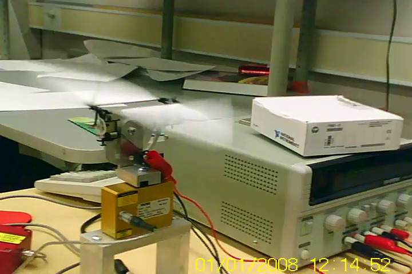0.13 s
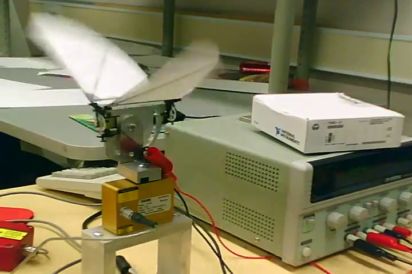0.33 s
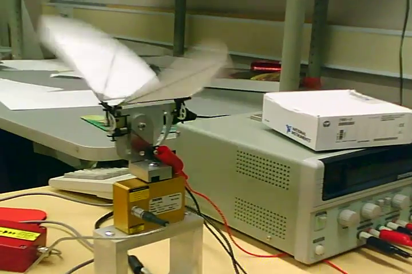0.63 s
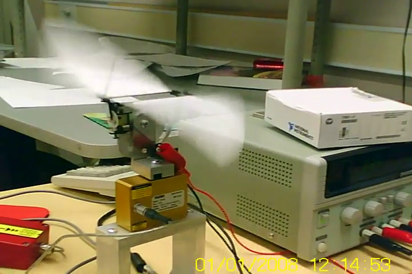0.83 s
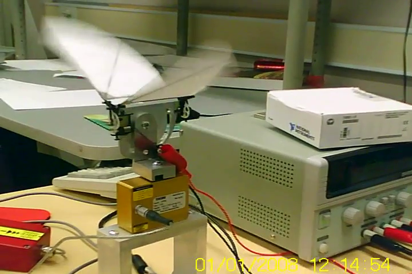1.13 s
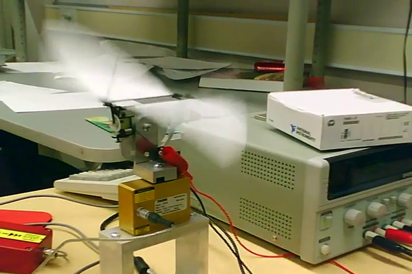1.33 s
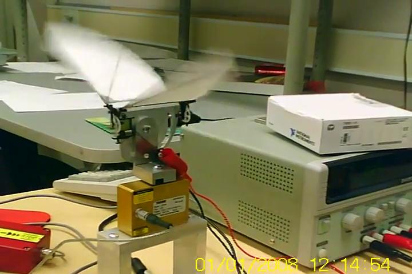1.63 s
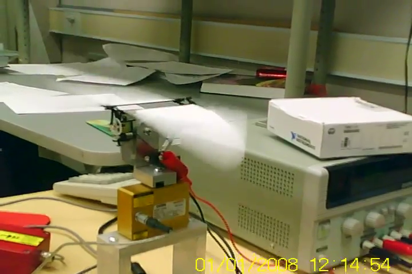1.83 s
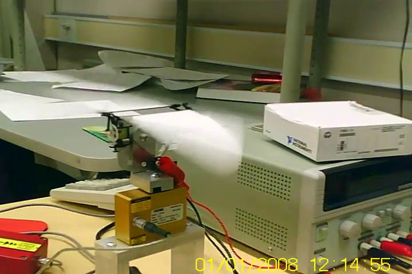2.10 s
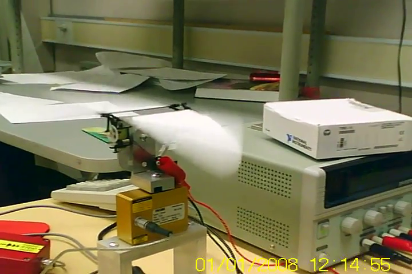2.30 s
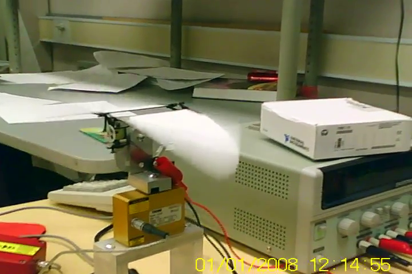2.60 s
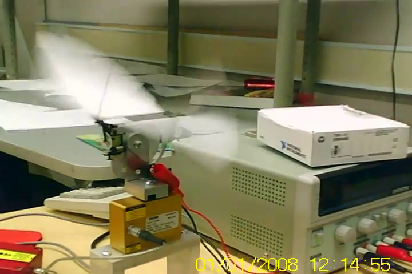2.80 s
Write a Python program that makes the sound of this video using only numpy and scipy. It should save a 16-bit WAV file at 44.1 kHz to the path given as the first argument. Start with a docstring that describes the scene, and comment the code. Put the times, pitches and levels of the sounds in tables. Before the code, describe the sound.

After a faint hiss with a soft low thump, a small flapping-wing machine starts abruptly at full speed, its gears rattling about twenty bursts a second, with hum and wing puffs buffeting a close microphone in a lab.

```python
"""A lab bench, faint at first: a soft low thump as the recorder's input switches on, with thin hiss and whine.
Then a small motor-driven flapping-wing rig cuts in at full speed, its crank beating the wings ten times a second.
On each up and down stroke loaded gear teeth, as bursts of coloured noise, rattle through the frame into the room.
The rig hums in wavering sines, and the wings buffet the microphone with low noise and puffs of air.
Two sharp ticks, the second as a short filtered-noise scrape begins, stand out; a higher tick comes later."""
import sys
import numpy as np
from scipy import signal
from scipy.fft import rfft, irfft
from scipy.io import wavfile

SR = 44100
rng = np.random.default_rng(int(sys.argv[2]) if len(sys.argv) > 2 else 0)


def master(y):
    """Save y as 16-bit WAV."""
    cut = np.clip(np.atleast_2d(y).T, -1, 1)
    pcm = np.round(cut * 32767)  # scale
    wavfile.write(sys.argv[1], SR, pcm.astype(np.int16))


N = 130095

START_S, FLAP_HZ = 0.712, 9.962  # the rig cuts in; crank turns per second


def undb(db):
    """Decibels to gain."""
    return 10 ** (np.asarray(db) / 20)


def unit(x):
    """Scale to rms 1."""
    return x / np.sqrt(np.mean(x ** 2))


def colour(x, points):
    """Filter by a curve of (frequency [Hz], gain [dB]), straight over log frequency; the result has rms 1."""
    hz, db = np.array(points, float).T
    f = np.maximum(np.arange(N // 2 + 1) * SR / N, 1)
    gain = undb(np.interp(np.log(f), np.log(hz), db))
    return unit(irfft(rfft(x) * gain, N))


def envelope(t, start, attack, hold, release, db):
    """Straight rise, hold and exponential fall."""
    age = t - start
    rise = np.clip(age / attack, 0, 1)
    fall = np.exp(-np.maximum(age - attack - hold, 0) / release)
    return undb(db) * rise * fall


def tones(t, lines):
    """Steady sines in random phase from rows of (frequency [Hz], rms level [dB])."""
    return sum(np.sqrt(2) * undb(db) * np.sin(2 * np.pi * (hz * t + rng.random())) for hz, db in lines)


def wander(rate_hz):
    """Smooth random motion with spread 1."""
    slow = [(rate_hz / 2, 0), (rate_hz, -3), (rate_hz * 10, -60), (rate_hz * 20, -120)]
    return colour(rng.standard_normal(N), slow)


def background(t):
    """Faint hiss and electrical whine, with a soft low thump as the recorder's input switches on, dying away."""
    # spectrum of the hiss: (frequency [Hz], relative density [dB per Hz])
    hiss_curve = [(60, -14), (400, -12), (800, -14), (1300, -14.5), (5000, -15), (7000, -14.5),
                  (10500, -17.5), (11800, -32)]
    # steady lines of the electrical whine: (frequency [Hz], rms level [dB])
    whine_lines = [(1200, -89), (3892, -86.5), (5599, -83), (7402, -85), (9598, -89)]
    start_s, hiss_db = .036, -74
    thump_db, thump_decay_s = -46, 0.37  # peak level

    age = np.maximum(t - start_s, 0)
    thump = -undb(thump_db) * np.exp(-age / thump_decay_s)
    hiss = undb(hiss_db) * colour(rng.standard_normal(N), hiss_curve)
    return (thump + hiss + tones(t, whine_lines)) * (t >= start_s)


def rattle(t, turn_s):
    """Uneven tooth impacts as very short noise bursts; part of their grain repeats on every crank turn."""
    tooth_hz, jitter = 447.2, .25  # one over the median gap; spread of the gaps' natural logarithm
    scatter_db, ring_s = 1.6, 0.0021
    wear_share = 0.24  # share of the grain's power that repeats with the turn

    chance = rng.standard_normal((2 * int(tooth_hz * N / SR), 2))
    gaps = np.exp(jitter * chance[:, 0]) / tooth_hz
    hits = np.cumsum(gaps) - gaps[0]
    last = np.maximum(np.searchsorted(hits, t) - 1, 0)  # latest impact before each moment
    strength = undb(scatter_db * chance[last, 1])
    bursts = strength * np.exp(-np.abs(t - hits[last]) / ring_s)

    worn = rng.standard_normal(N)[(turn_s * SR).astype(int)]
    fresh = rng.standard_normal(N)
    return bursts * (np.sqrt(wear_share) * worn + np.sqrt(1 - wear_share) * fresh)


def gears(t, turn_s):
    """The gear train rattles all the time and much harder under the load of each stroke."""
    # load of the two strokes:
    # (start in the turn [s], attack [s], hold [s], release [s], level before scatter [dB])
    strokes = [(0.011, 0.013, 0.012, 0.0047, -44.5), (0.0627, 0.0056, 0.0076, 0.012, -44)]
    # looser chatter as each stroke runs out:
    # (start in the turn [s], attack [s], hold [s], release [s], level [dB])
    run_outs = [(0.029, 0.012, 0.015, 0.002, -51.5), (.079, 0.0013, 0.015, 0.0051, -52)]
    # frame on the first stroke, the second stroke and running free:
    # (frequency [Hz], relative density [dB per Hz])
    first_colour = [(300, -19.5), (1000, -28), (1600, -12.5), (2600, -11), (3400, -12), (4200, -6),
                    (4700, -11), (5350, -17), (5900, 2), (6600, 0), (7150, -6.5), (7800, -13), (8300, -5),
                    (9000, -29), (10400, -16.5), (11500, -30.5)]
    second_colour = [(300, 3.5), (900, -20), (1600, 1), (2500, -4), (3100, 3), (3500, -4.5), (4000, 6),
                     (4700, -5), (5350, -6.5), (6000, 4.5), (6600, 6.5), (7200, -7), (7650, 3), (9000, -20),
                     (10500, -12.5), (11500, -24)]
    free_colour = [(180, -2), (350, -8.5), (550, -8), (850, -8.5), (1150, -5.5), (1700, -6.5), (2400, -15),
                   (3300, -15), (4100, -12), (5200, -18), (6400, -14.5), (7000, -20), (7700, -10),
                   (9000, -22.5), (10400, -27), (11500, -45)]
    free_db, free_swell_db = -49, -0.1
    stroke_scatter_db = .7

    def load(row):
        # the second term is what still rings on from the turn before
        return envelope(turn_s, *row) + envelope(turn_s + 1 / FLAP_HZ, *row)

    swell_db = free_swell_db * np.sin(2 * np.pi * 2 * FLAP_HZ * turn_s - np.pi / 2)
    out = undb(free_db + swell_db) * colour(rattle(t, turn_s), free_colour)
    turn = np.floor((t - START_S) * FLAP_HZ).astype(int)
    for stroke, frame in zip(strokes, (first_colour, second_colour)):
        force = undb(stroke_scatter_db * rng.standard_normal(N))[turn]
        out = out + force * load(stroke) * colour(rattle(t, turn_s), frame)
    chatter = sum(load(row) for row in run_outs)
    return out + chatter * colour(rattle(t, turn_s), second_colour)


def room(x, t):
    """Short diffuse tail of the lab, as noise that decays exponentially."""
    t60_s, tail_db = .3, -14
    tail = rng.standard_normal(N) * np.exp(-np.log(1000) * t / t60_s)
    tail = tail / np.sqrt(np.sum(tail ** 2))
    return x + undb(tail_db) * signal.fftconvolve(x, tail)[:N]


def hum(t):
    """The sine lines of the running rig's hum each waver in strength."""
    # lines of the hum: (frequency [Hz], rms level before the waver [dB])
    hum_lines = [(120.1, -54.5), (303.0, -65), (418.5, -74), (667.6, -71.5), (947.2, -71.5), (1125.3, -67)]
    waver_db, waver_hz = 1.5, 5.7
    return sum(tones(t, [line]) * undb(waver_db * wander(waver_hz)) for line in hum_lines)


def wing_air(t):
    """Turbulence and three uneven puffs a wingbeat press on the microphone."""
    # turbulence off the wings: (frequency [Hz], relative density [dB per Hz])
    air_colour = [(3, 6), (14, -6.5), (28, 5), (55, -11), (85, -12.5), (130, -18), (250, -40), (600, -58)]
    # when puffs arrive, before jitter: (time within a turn [s])
    gusts_s = [0.0036, 0.0341, 0.0696]
    air_db, gust_db, gust_scatter_db = -48, -33.5, 2.5
    gust_width_s, gust_jitter_s = 0.004, 0.0035

    puffs = np.zeros(N)
    for turn in np.arange(START_S, N / SR, 1 / FLAP_HZ):
        for offset in gusts_s:
            at = turn + offset + gust_jitter_s * rng.standard_normal()
            strength = undb(gust_scatter_db * rng.standard_normal())
            puffs -= strength * np.exp(-.5 * np.minimum(((t - at) / gust_width_s) ** 2, 20))
    puffs -= np.mean(puffs[t > START_S])  # no standing pressure
    turbulence = colour(rng.standard_normal(N), air_colour)
    return undb(gust_db) * puffs + undb(air_db) * turbulence


def ticks(t):
    """Dry ticks, a very short bell-shaped swell of a tone with a little noise crack."""
    # sharp ticks: (time [s], tone peak level [dB], pitch [Hz], width [s])
    tick_rows = [(1.3374, -27, 1940, 0.00028), (1.3866, -23, 1940, 0.00027),
                 (2.2684, -22.5, 3500, 0.000089)]
    # spectrum of the crack: (frequency [Hz], relative density [dB per Hz])
    crack_colour = [(800, -18), (1500, -17), (6500, -2), (8000, 5), (10000, -19)]
    crack_db = -15  # against the tick's peak

    crack = undb(crack_db) * colour(rng.standard_normal(N), crack_colour)
    out = np.zeros(N)
    for at, db, hz, width in tick_rows:
        swell = undb(db) * np.exp(-.5 * ((t - at) / width) ** 2)
        out += swell * (np.cos(2 * np.pi * hz * (t - at)) + crack)
    return out


def scrape(t, turn_s):
    """A brief grainy rub in the midrange that brightens by crossfading two filters."""
    # the scrape as it starts and as it ends: (frequency [Hz], relative density [dB per Hz])
    start_colour = [(600, -11), (1200, 1), (1700, 10.5), (2700, -1), (4200, -29), (7000, -18)]
    end_colour = [(600, -20), (1200, -9), (2000, -3), (3000, -4), (4300, 0), (7000, -29.5)]
    start_s, length_s, edge_s = 1.385, 0.2, 0.004
    level_db = -48

    rub = envelope(t, start_s, edge_s, length_s, edge_s, level_db)
    progress = np.clip((t - start_s) / length_s, 0, 1)
    grain = rattle(t, turn_s)
    dull = (1 - progress) * colour(grain, start_colour)
    bright = progress * colour(grain, end_colour)
    return rub * (dull + bright)


def scene():
    """Quiet hiss and whine, then the rig at full speed."""
    t = np.arange(N) / SR
    turn_s = (t - START_S) % (1 / FLAP_HZ)  # time within the crank turn
    in_room = room(gears(t, turn_s) + scrape(t, turn_s), t)
    rig = in_room + hum(t) + wing_air(t) + ticks(t)
    return (rig * (t >= START_S) + background(t))[None]


def record(dry):
    """The recorder cuts the top steeply, with an elliptic low-pass."""
    top_hz = 11850
    return signal.sosfilt(signal.ellip(10, .2, 80, top_hz, fs=SR, output="sos"), dry)


dry = scene()
out = record(dry)
master(out)
```